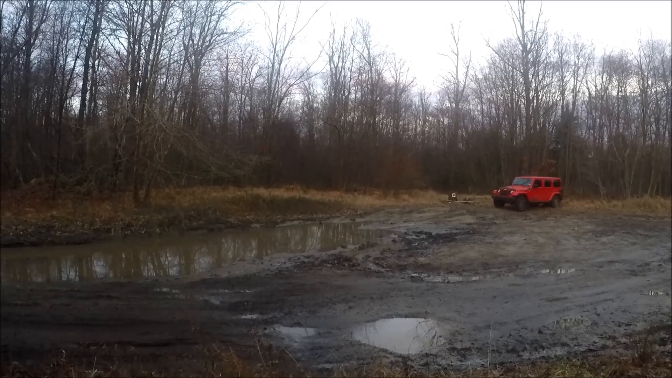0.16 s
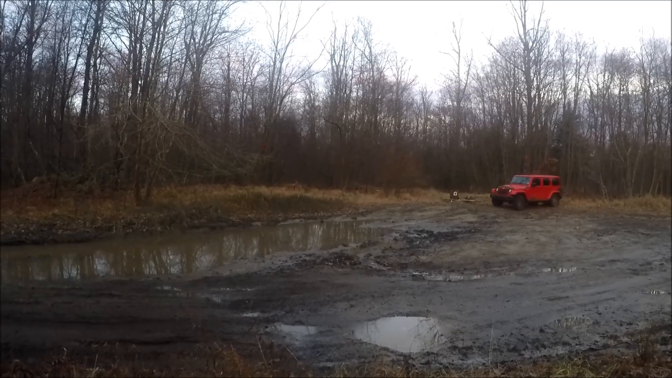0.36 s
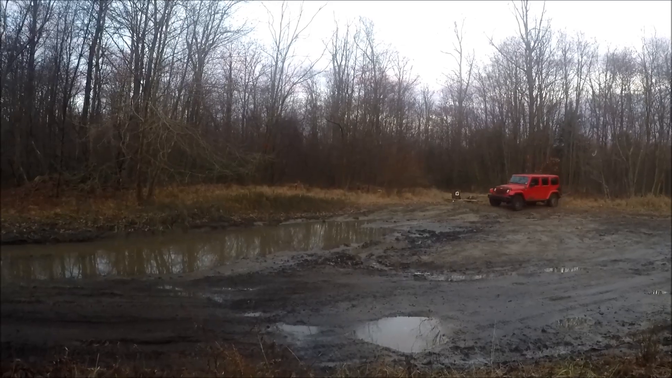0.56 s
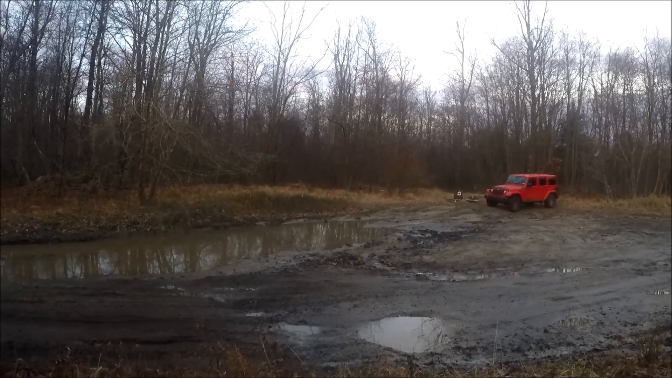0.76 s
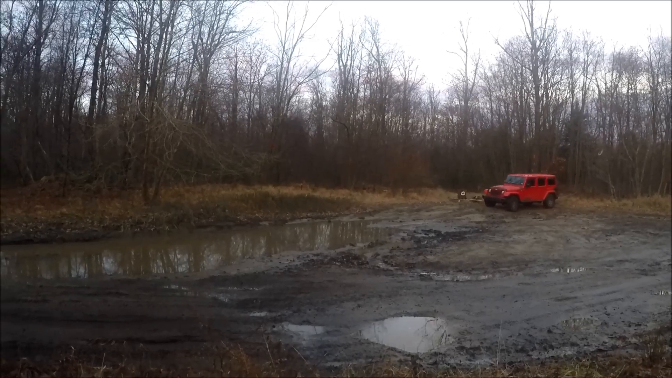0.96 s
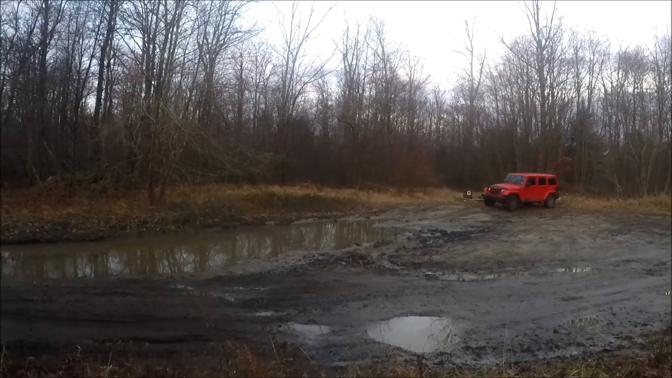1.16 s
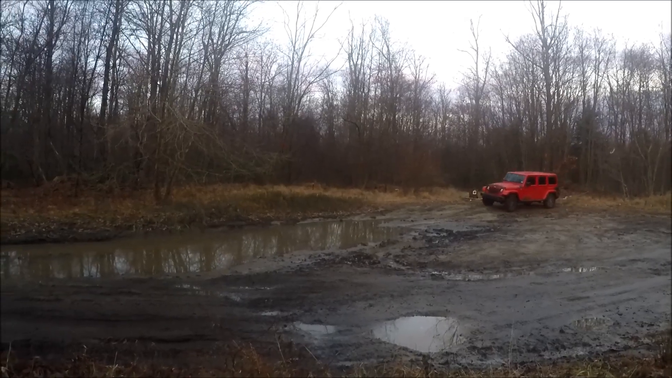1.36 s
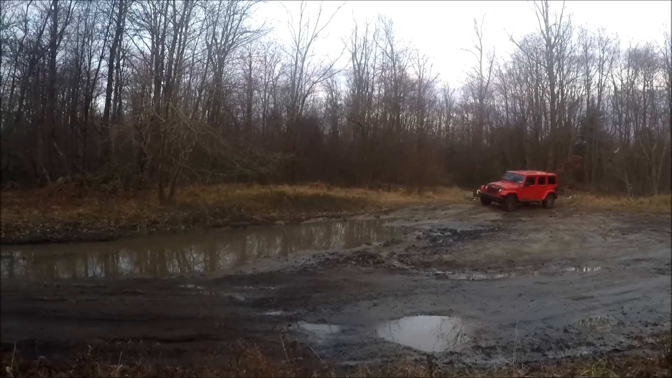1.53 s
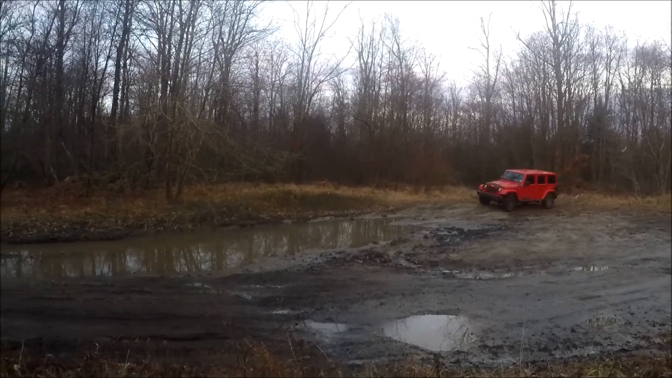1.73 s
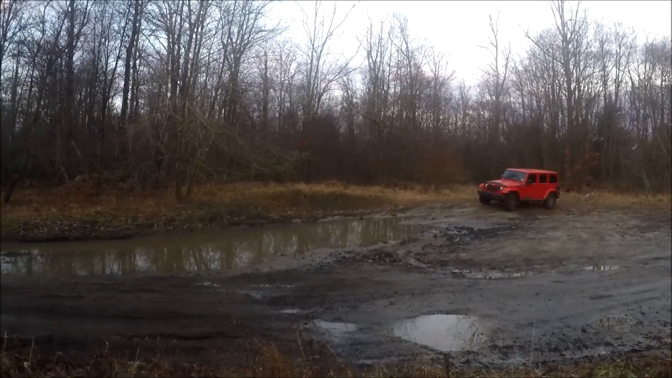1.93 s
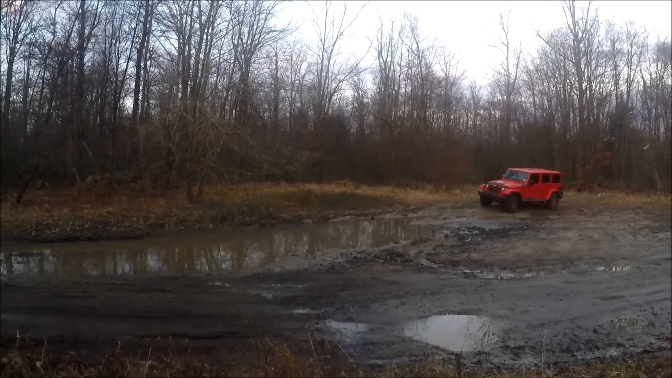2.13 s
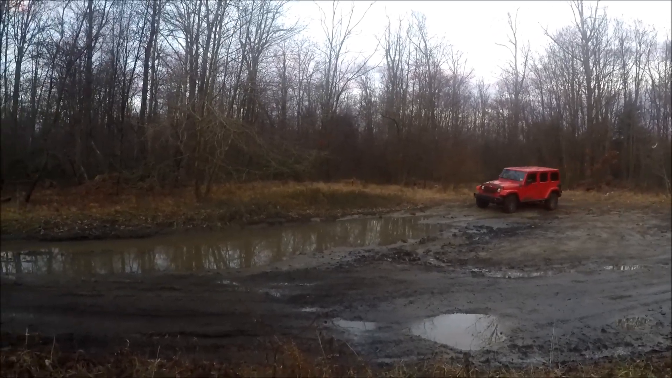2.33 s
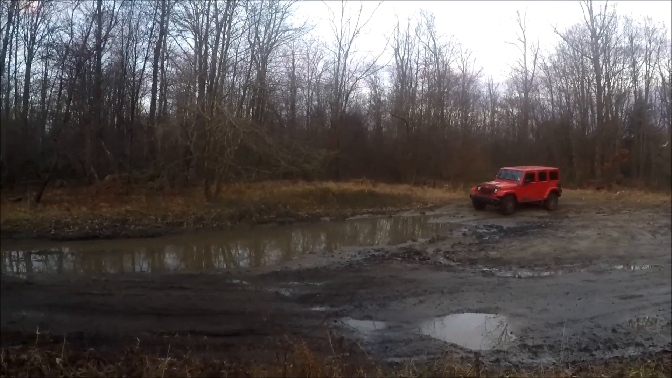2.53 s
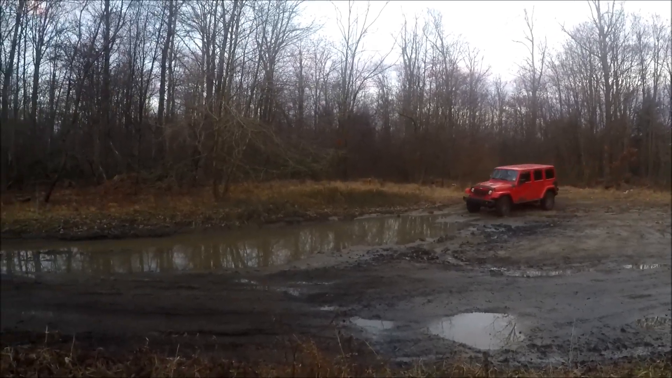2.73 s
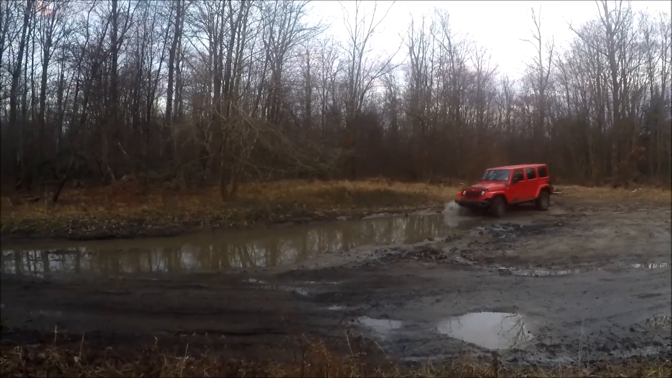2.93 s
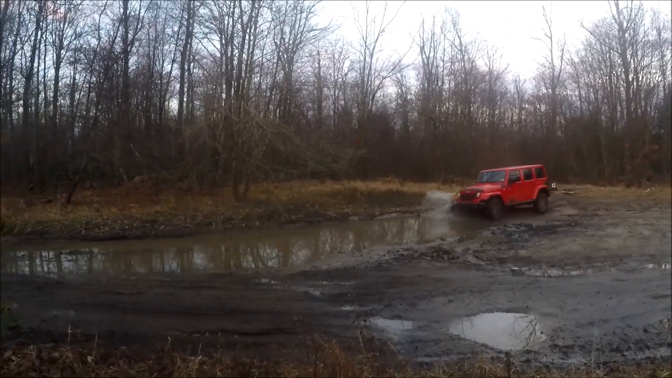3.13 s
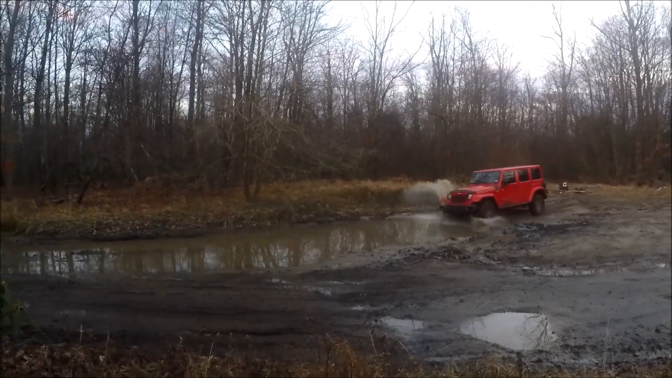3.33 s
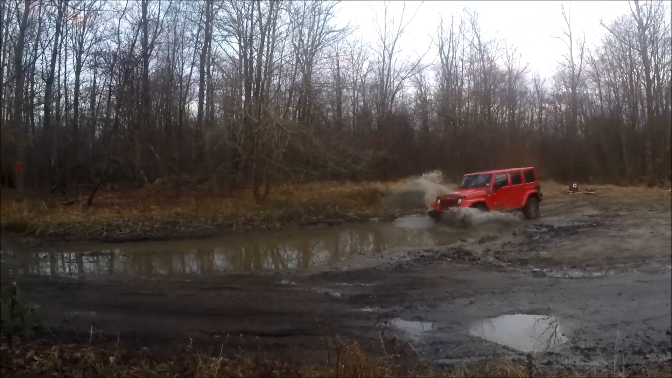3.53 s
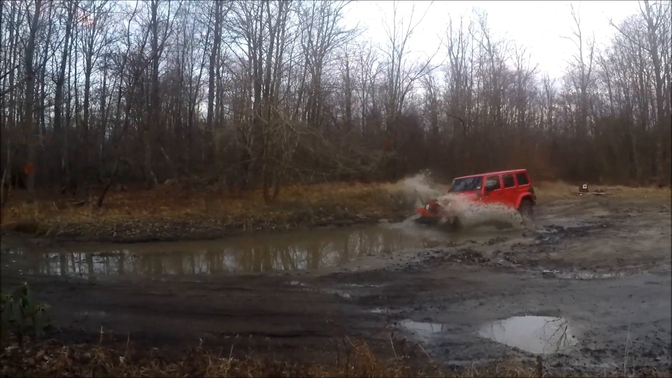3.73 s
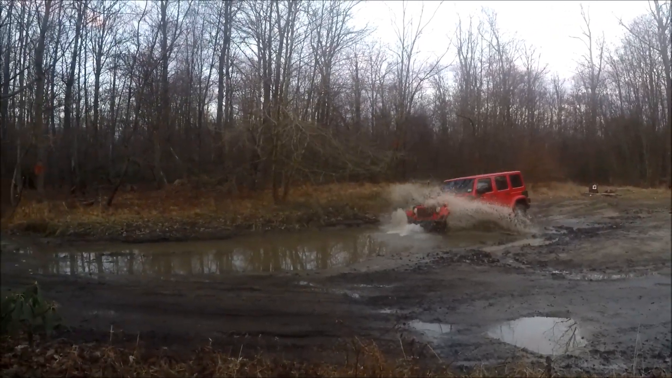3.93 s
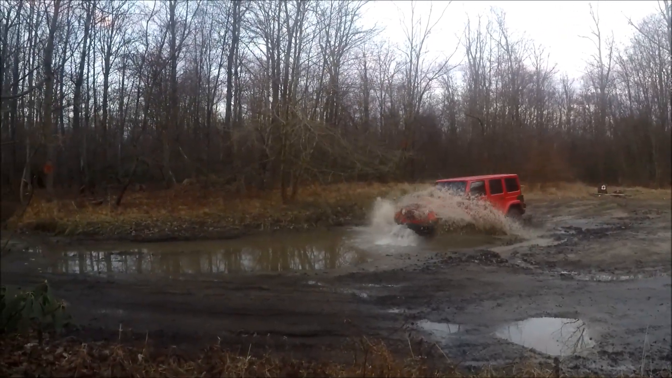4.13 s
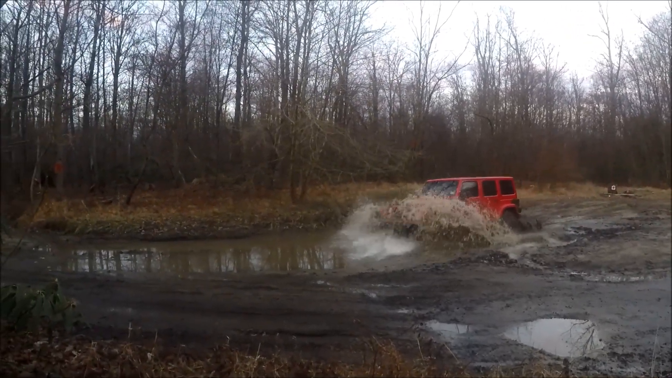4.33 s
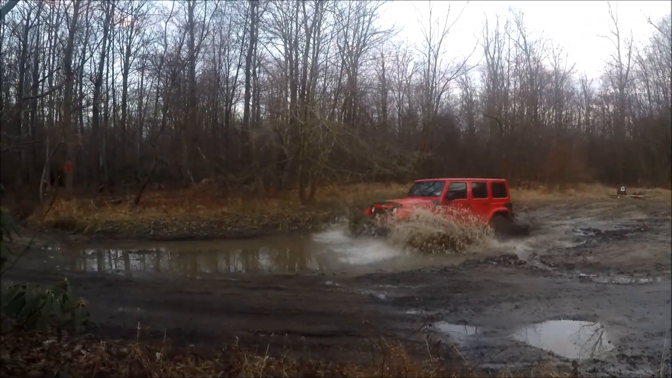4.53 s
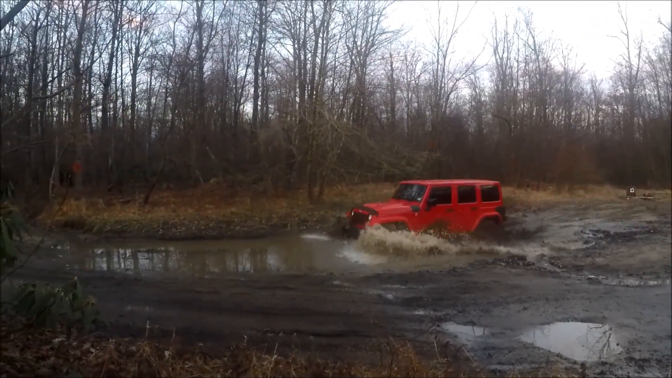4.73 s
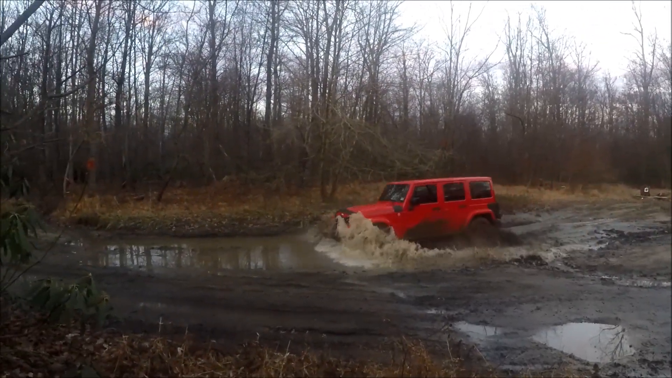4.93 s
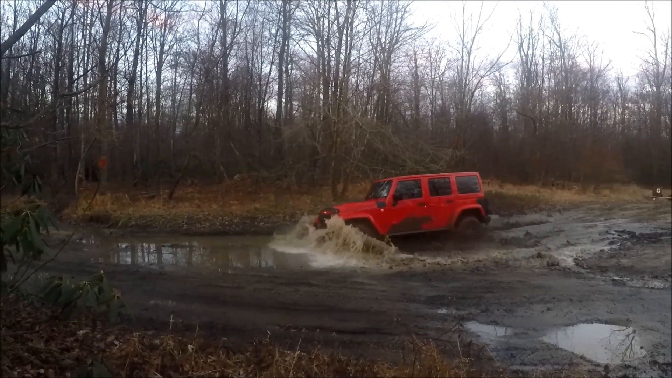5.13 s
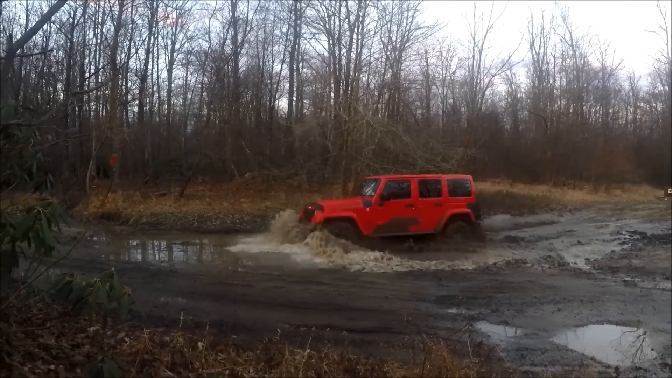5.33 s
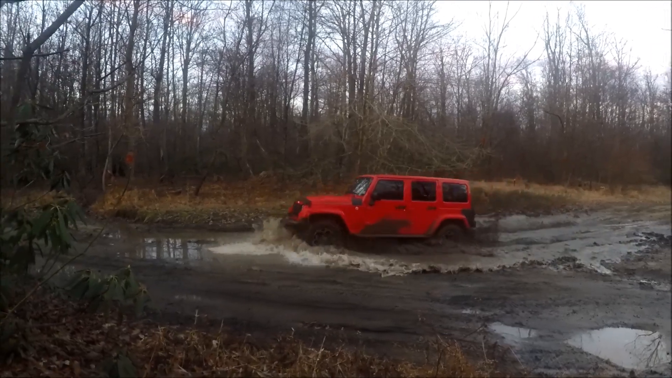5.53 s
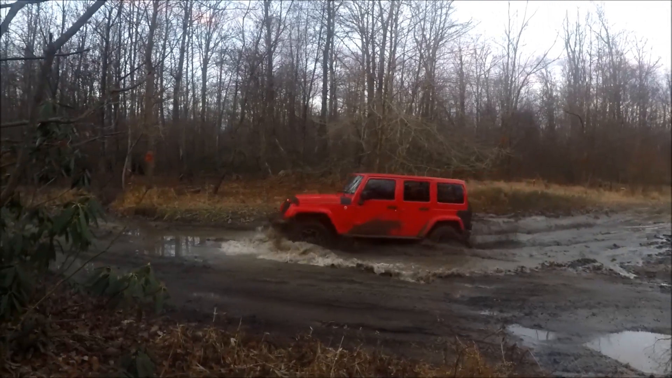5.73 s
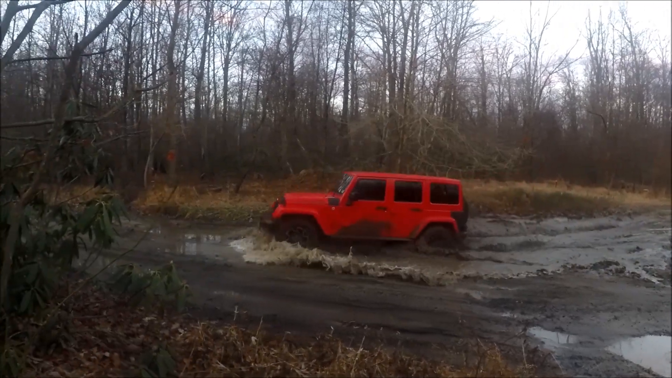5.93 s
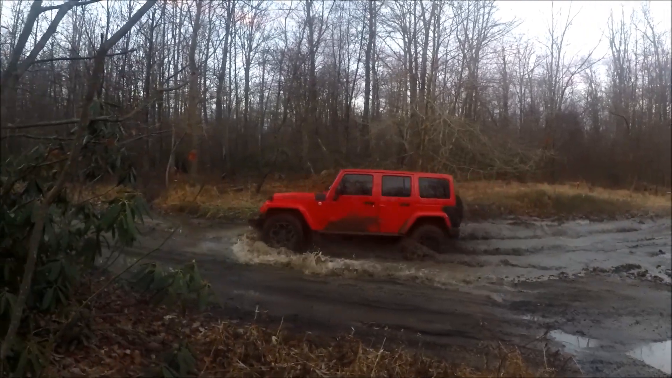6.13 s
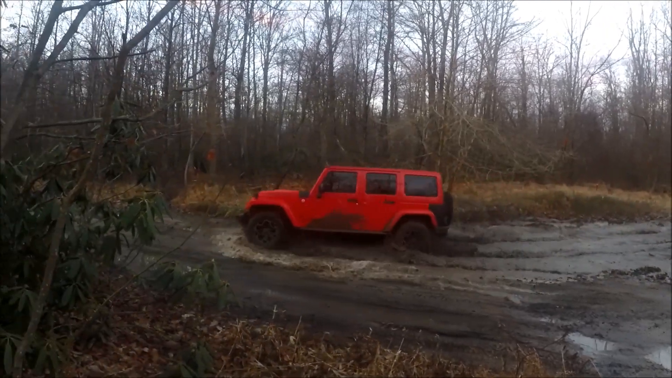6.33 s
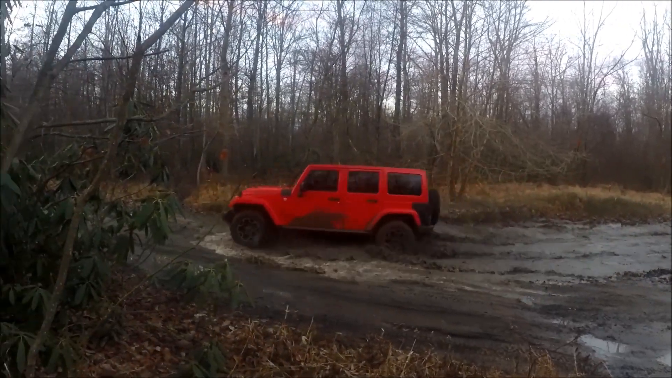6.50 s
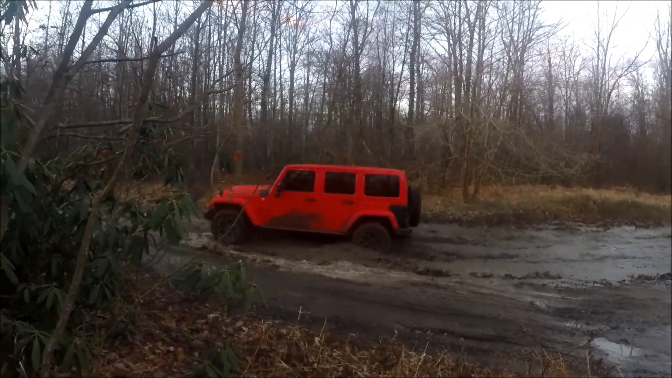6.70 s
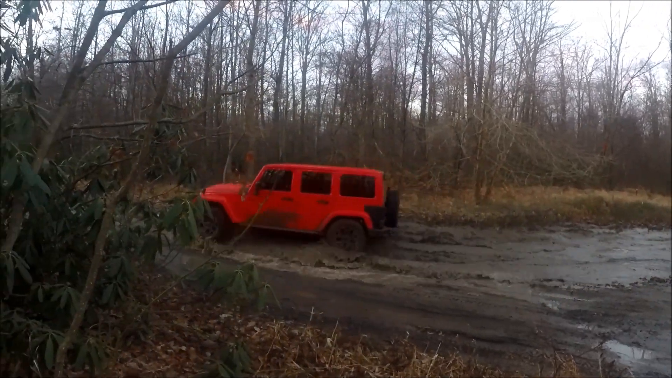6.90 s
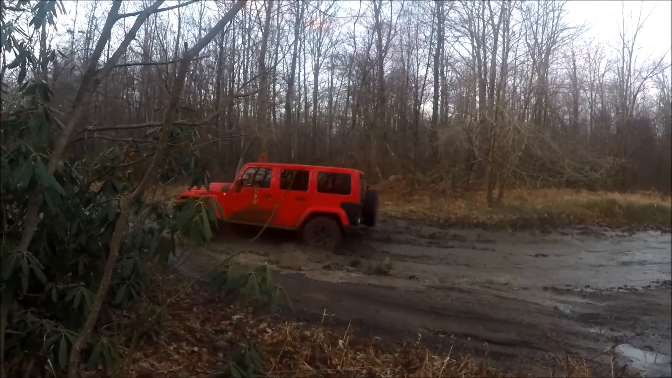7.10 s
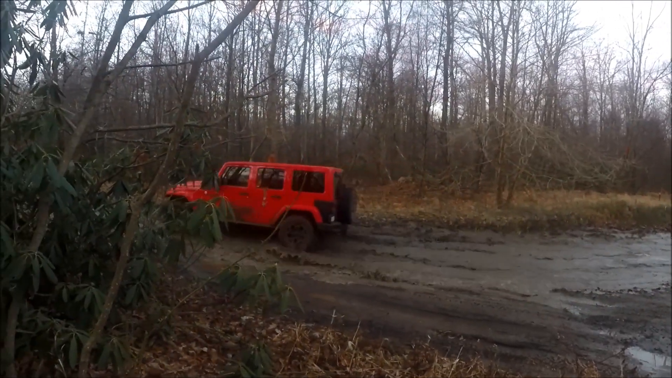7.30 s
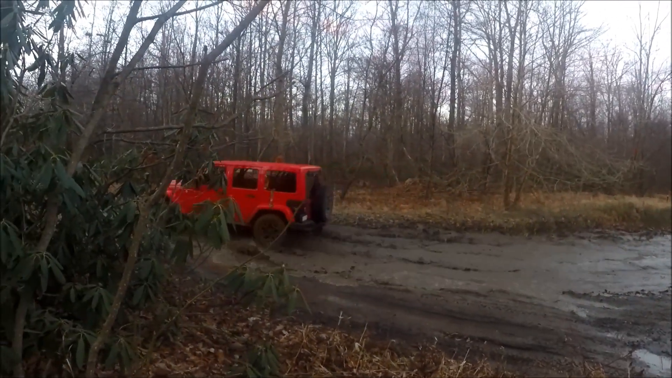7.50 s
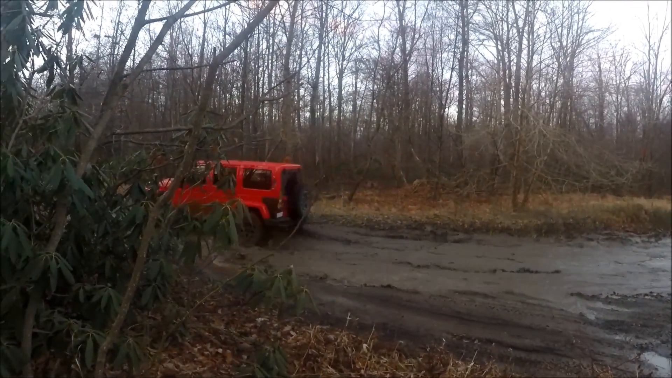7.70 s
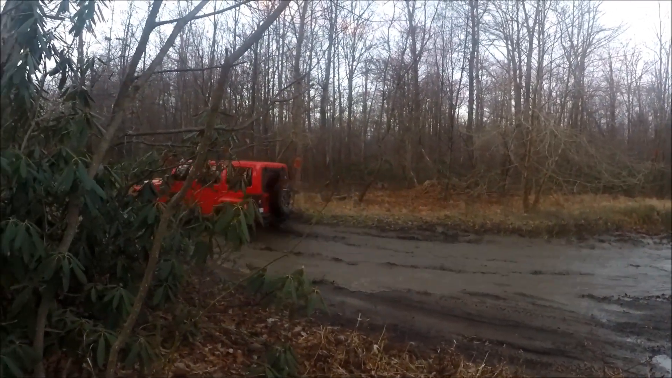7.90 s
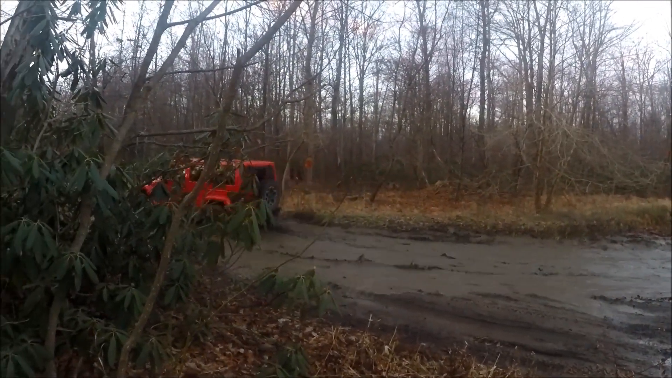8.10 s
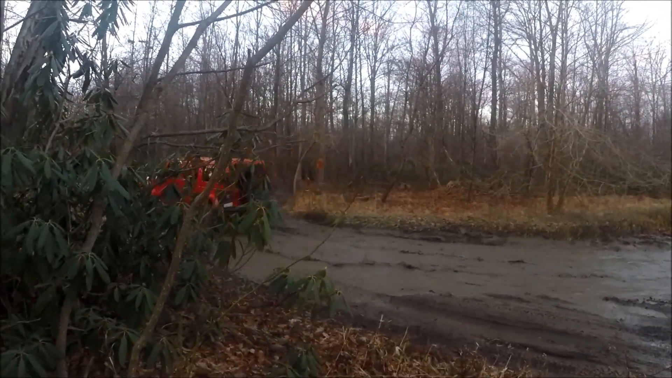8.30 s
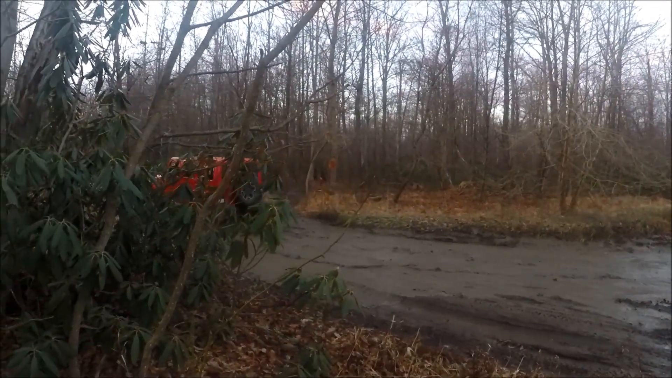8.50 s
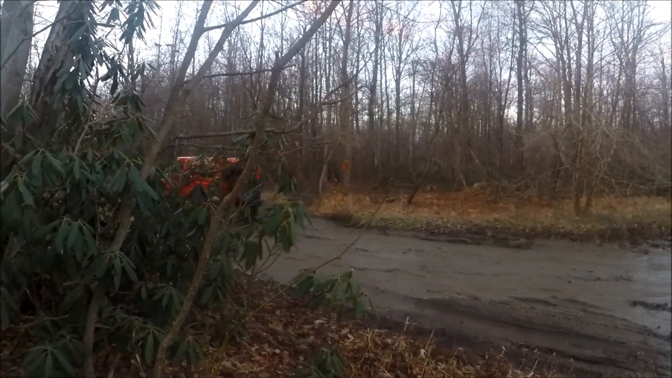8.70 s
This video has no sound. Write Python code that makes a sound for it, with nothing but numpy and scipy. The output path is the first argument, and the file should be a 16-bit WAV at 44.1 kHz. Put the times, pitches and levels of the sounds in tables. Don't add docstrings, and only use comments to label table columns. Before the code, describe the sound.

A quiet start of light wind, faint hiss and distant engine rumble. The engine pulls harder, a finger knocks the recorder, and water bursts into broad, bright, grainy spray. More knocks follow at once. The vehicle passes in rough, throaty exhaust and continuous splashing, with low wind buffeting the open microphones, then recedes; the engine falls more than the wet hiss, with a last puff and click.

```python
import sys
import numpy as np
from scipy import signal
from scipy.fft import rfft, irfft, next_fast_len
from scipy.io import wavfile
from scipy.ndimage import uniform_filter1d, minimum_filter1d, map_coordinates

SR = 44100
rng = np.random.default_rng(int(sys.argv[2]) if len(sys.argv) > 2 else 0)


def nominal_scale(level):
    x = np.asarray(level, float) / 20
    return 10 ** x


def transcribe(signal):
    frames = np.atleast_2d(signal).T
    limited = np.clip(frames, -1, 1)
    pcm = np.round(limited * 32767).astype(np.int16)
    wavfile.write(sys.argv[1], SR, pcm)


N = 385875

LOW_CUT_HZ = 157
# start_s, let_through_db
LOW_CUT_OPENING = [(0.0, -15), (.6, -19), (1.35, -28), (2.4, -35), (3.1, -39), (3.28, -18), (4.2, -27),
                   (4.5, -2), (5.1, 5.7), (8.75, 1)]


def rms_one(x):
    return x / np.sqrt(np.mean(x ** 2) + 1e-20)


def in_time(rows):
    s, *columns = np.transpose(rows)
    return [np.interp(np.arange(N) / SR, s, column) for column in columns]


def at_hz(points, hz):
    point_hz, value = np.array(points).T[:2]
    return np.interp(np.log(hz), np.log(point_hz), value)


def drift(rate):
    r = np.exp(-80 * np.pi * rate / SR)
    chance = rng.standard_normal(N // 40 + 2002)
    slow = signal.lfilter([1], [1, -2 * r, r * r], chance)[2000:]
    return np.interp(np.arange(N) / 40, np.arange(len(slow)), rms_one(slow))


def cut(x, hz, kind, order):
    return signal.sosfilt(signal.butter(order, hz, kind, fs=SR, output="sos"), x)


def ring(x, hz, t60):
    r = nominal_scale(-60 / (t60 * SR))
    w = 2 * np.pi * hz / SR
    return signal.lfilter([0, np.sin(w)], [1, -2 * r * np.cos(w), r * r], x + 1e-18)


def grains(per_s, spread_db, shape):
    sizes = nominal_scale(spread_db * np.minimum(rng.exponential(1, shape), 5))
    signs = rng.choice([-1, 1], shape)
    return rms_one(sizes * signs * (rng.random(shape) < per_s / SR))


def clicks(times, levels_db):
    out = np.zeros(N)
    out[(np.asarray(times) * SR).astype(int)] = nominal_scale(np.asarray(levels_db))
    return out


def hiss():
    # pitch_hz, level_db per Hz
    hiss_colour = [(150, -40), (450, -1), (1500, 5), (4000, -7), (6500, -7), (8000, -1), (10500, -7),
                   (12000, -12), (14500, -17)]
    # pitch_hz, level_db
    whine = [(8210, -92)]
    size = next_fast_len(N)
    hz = np.arange(size // 2 + 1) * SR / size + 1e-3
    spectrum = rfft(rng.standard_normal((2, size))) * nominal_scale(at_hz(hiss_colour, hz))
    noise = irfft(spectrum, size)[:, :N]
    whine_hz, whine_db = whine[0]
    thin_tone = nominal_scale(whine_db - 12) * np.sin(2 * np.pi * whine_hz * np.arange(N) / SR)
    return nominal_scale(-52.5) * rms_one(noise) + thin_tone


def gusts_db():
    # start_s (middle of the bell), level_db above the breeze, length_s
    gusts = [(.3, 3, 0.18), (.58, -1, .08), (2.026, 4, .05), (4.04, 7, .15), (5.105, 3, 0.11),
             (5.627, 8, 0.19), (6.22, 9, 0.084), (6.397, 6.5, .15), (6.663, 3, 0.037), (6.815, 7, 0.067),
             (7.02, 2.5, 0.071), (7.27, 7.5, 0.35), (7.55, 1, 0.067), (8.72, 7, .06)]
    t = np.arange(0, N, 64) / SR
    bells = sum(db * np.exp(-((t - s) / length) ** 2 * 2) for s, db, length in gusts)
    return np.interp(np.arange(N) / SR, t, bells)


def wind():
    # start_s, level_db, width_s
    puffs = [
        (8.228, -12, 0.0044),
        (8.529, -9.5, 0.0053),
    ]
    breeze_db, swing_db = -34, 1.6
    pressure = cut(rng.standard_normal((3, N)), 49, "low", order=3)
    common, left, right = cut(pressure, 3.3, "high", order=2)
    level_db = breeze_db + in_time(LOW_CUT_OPENING)[0] + gusts_db()
    lumps = nominal_scale(level_db + swing_db * drift(4.6) + 2.05 * drift(30))
    out = lumps * rms_one(common + 0.41 * np.array([left, right]))
    for s, db, width in puffs:
        near = np.arange(int((s - .1) * SR), int((s + .15) * SR))
        for port, late_s in enumerate((.0018, 0)):
            u = (near / SR - s - late_s) / width
            suck = np.exp(np.minimum(u, 0) * 0.98) * (u < 0)
            push = np.exp(-np.maximum(u, 0) * 0.89) * (u >= 0)
            out[port, near] += nominal_scale(db) * cut(push - suck, 200, "low", order=2)
    return out


def tone(rows, orders):
    fade_in = (rows[0][0] - .08, rows[0][1], -80)
    fade_out = (rows[-1][0] + 0.072, rows[-1][1], -80)
    hz, db = in_time([fade_in] + rows + [fade_out])
    phase = 2 * np.pi * np.cumsum(hz) / SR
    return nominal_scale(db + 7.5) * sum(nominal_scale(d) * np.sin(round(k) * phase + k * k) for k, d in orders)


def engine():
    # start_s, rumble_db
    load = [(0.0, -42.5), (1.0, -44), (1.8, -42), (2.45, -36.5), (2.7, -40), (3.1, -35.5), (3.5, -33.5),
            (3.74, -27.5), (4.05, -28.5), (4.28, -23.5), (4.6, -25.5), (4.8, -24.5), (5.2, -24.5),
            (5.85, -21.5), (6.1, -26.5), (6.45, -25), (7.3, -30.5), (8.75, -40.5)]
    # pitch_hz, width_hz, level_db
    resonances = [(166, 81, -4), (221, 42.5, -0.5), (256.7, 56, -1.5), (386, 204, -5)]
    # start_s, base_hz, level_db of order 4
    pull = [(2.62, 50.5, -54), (2.644, 51.05, -46), (2.86, 54.4, -48), (2.944, 57.6, -53), (3.1, 59, -39)]
    # order, level_db
    pull_orders = [(3, -16), (4, 1.5), (5, -1), (6, -10)]
    # start_s, pitch_hz, level_db
    drone = [(5.85, 121, -35), (5.886, 117, -30), (5.95, 114, -32.5), (6.22, 103, -35), (6.382, 105, -32.5),
             (6.46, 110.5, -34.5), (6.55, 103.6, -43)]
    rumble_db = in_time(load)[0] + 0.72 * drift(12.5)
    deep_db = rumble_db - 7.5 + 0.59 * in_time(LOW_CUT_OPENING)[0] + 0.13 * gusts_db()
    beats = grains(260, 1.0, (3, N)) * nominal_scale(0.65 * drift(3.1))
    beats = beats + 0.65 * rng.standard_normal((3, N))
    pipe = np.zeros((3, N))
    for k, (hz, width_hz, db) in enumerate(resonances):
        pipe += (-1) ** k * nominal_scale(db) * rms_one(ring(beats, hz, 1.71 / width_hz))
    above_cut = cut(pipe, 0.908 * LOW_CUT_HZ, "high", order=12)
    rumble = rms_one(cut(above_cut, 860, "low", order=2))
    deep = rms_one(cut(cut(beats, LOW_CUT_HZ, "low", order=8), 49, "high", order=2))
    out = nominal_scale(rumble_db + 2.5) * rumble * nominal_scale([[0], [-14], [-14]])
    out += nominal_scale(deep_db + 1.5) * deep * nominal_scale([[0], [-15], [-15]])
    out[0] += tone(drone, [(0.94, 0)]) + tone(pull, pull_orders)
    return out


def water():
    # start_s, spray_db, drop_fineness_db
    thrown = [(0.0, -51, -0.5), (1.1, -48.5, -2), (2.08, -42.5, -4), (2.45, -42.5, -4.5),
              (2.82, -33.5, 1.5), (2.86, -24.5, 7), (2.93, -21, 7), (3.12, -25.5, 1), (3.32, -21.5, 9),
              (3.45, -20.5, 6.5), (3.55, -24, 2), (4.3, -26, 1), (4.66, -21, 7), (5.5, -22.5, 3.5),
              (6.31, -22, 4.5), (7.65, -23.5, 1.2), (8.24, -25.5, 1.5), (8.75, -27.5, 1.5)]
    # start_s, distance_m
    distance = [(0.0, 16.8), (2.6, 23.2), (3.3, 22.8), (4.3, 13.4), (4.9, 13.3), (6.3, 20), (7.4, 24.4),
                (8.75, 35)]
    # pitch_hz, level_db per Hz
    spray_colour = [(400, -4.5), (800, 11), (1600, 4.5), (2400, 0), (3300, -0.5), (4500, -2), (5900, 3),
                    (7000, -6), (8200, -15), (9500, -36.5), (11500, -29), (14500, -39)]
    # pitch_hz, level_db
    before_plunge = [(2400, 0.6), (3500, 3), (4500, -4.5), (5700, 2), (7000, 1.8)]
    # pitch_hz, level_db
    off_trees = [(400, -9), (800, -14.5), (1600, -9.5), (3000, -10.5), (4500, -7), (6000, -6), (7300, -1.5),
                 (8250, 18), (9200, 19), (12000, 12)]
    spray_db, fine_db = in_time(thrown)
    mist_db = 5 - 0.67 * in_time(distance)[0]
    since = np.arange(N) / SR - 2.75
    wet = since > 0
    cloud_db = -13 * np.exp(-np.maximum(since, 0) / 0.71) * wet
    drops = grains(9000, 2.4, (2, 3, N)) + 0.85 * rng.standard_normal((2, 3, N))
    edges = 400 * 2 ** np.arange(0, 5.4, 1 / 3)
    surge = drift(36)
    sheets = [drift(14) for _ in range(4)]
    out = np.zeros((3, N))
    for k, (low, high) in enumerate(zip(edges, edges[1:])):
        hz = np.sqrt(low * high)
        heavy = at_hz([(1500, 0.78), (3200, 0.065)], hz)
        fine = at_hz([(3800, 0.18), (6500, 0.64), (9000, 1.17), (14000, 1.2)], hz)
        colour_db = at_hz(spray_colour, hz) + heavy * (3.5 - fine_db) + fine * mist_db
        colour_db = colour_db + at_hz([(9000, 0), (12500, 0.91)], hz) * cloud_db
        colour_db = colour_db + at_hz(before_plunge, hz) * (since < 0)
        flicker_db = 0.097 * surge + (0.54 + 0.19 * fine) * sheets[k // 4]
        flicker_db = flicker_db + .5 * drift(37) + 0.53 * drift(1.45)
        scattered = nominal_scale(at_hz(off_trees, hz))
        band = cut(drops[k % 2], [low, high], "band", order=2)
        out += band * nominal_scale(colour_db + flicker_db) * [[1], [scattered], [scattered]]
    return nominal_scale(spray_db + 8.5) * cut(out, 2 * LOW_CUT_HZ, "high", order=4)


def spurts():
    # start_s, level_db, pitch_hz, length_s
    jets = [
        (1.93, -30.5, 1700, .006),
        (3.258, -17.5, 6000, 0.022),
        (5.09, -22, 4000, 0.0066),
    ]
    out = np.zeros((3, N))
    for s, db, hz, length in jets:
        near = np.arange(int((s - .05) * SR), int((s + .05) * SR))
        noise = rng.standard_normal(len(near))
        jet = rms_one(cut(noise, [hz * 0.93, hz * 1.12], "band", order=2))
        out[0, near] += nominal_scale(db) * jet * np.exp(-((near / SR - s) / length) ** 2)
    return out


def handling():
    # start_s, level_db, thud_db above the crack
    taps = [
        (2.034, -25, -1.5),
        (2.532, -2.5, 3.5),
        (2.583, -24.5, 10),
        (3.143, -3.5, 5.5),
        (3.2027, -4.5, 9),
    ]
    # start_s, level_db, direction
    ticks = [
        (2.4811, -11, 1),
        (3.1895, -10, -1),
        (8.5236, -9, -1),
    ]
    # later_s, level_db
    rebounds = [(0.00142, -4.5), (0.00047, -5)]
    # pitch_hz, level_db, t60_s
    crack_modes = [
        [(840, -11, 0.0081), (1560, -31, 0.031), (1970, 5.5, 0.0036), (2930, -5, 0.0049)],
        [(740, 6.5, 0.0038), (1550, -21, 0.05), (2360, -3, 0.0043), (4840, -9, .002)],
    ]
    # pitch_hz, level_db, t60_s
    thud_modes = [
        [(258, -7, 0.066), (500, -16.5, 0.03)],
        [(162, 2, 0.072), (354, 3.2, 0.007)],
    ]
    thud_late = [.0003, .0009]
    s, db, thud_db = np.transpose(taps)
    flex = sum(way * clicks([at], [level_db]) for at, level_db, way in ticks)
    flex_left = 1.2 * ring(flex, 1300, .007) + .45 * ring(flex, 2600, .006)
    flex_right = -1.9 * ring(flex, 750, .003)
    out = np.array([flex_left, flex_right])
    for port, (later, rebound_db) in enumerate(rebounds):
        crack = clicks(s + later, db + rebound_db) - clicks(s, db)
        thud = clicks(s + thud_late[port], db + thud_db)
        out[port] += sum(nominal_scale(d) * ring(crack, hz, t60) for hz, d, t60 in crack_modes[port])
        out[port] += sum(nominal_scale(d) * ring(thud, hz, t60) for hz, d, t60 in thud_modes[port])
    soft = cut(out, 6600, "low", order=3)
    low_cut = signal.butter(5, LOW_CUT_HZ, "high", fs=SR, output="sos")
    return signal.sosfiltfilt(low_cut, soft)


def ports(sound):
    # pitch_hz, width_hz, depth_db
    left_dips = [(465, 61, -13.5), (1176, 482, -22.5), (2670, 580, -7.5), (3360, 120, -9),
                 (4100, 190, -3.5), (5810, 950, -10), (8250, 150, 3)]
    # pitch_hz, width_hz, depth_db
    right_dips = [(527, 254, -21.5), (1135, 176, -19.5), (2070, 266, -18.5), (2680, 270, -7.5),
                  (5050, 290, -1.5), (7300, 750, -19), (7900, 430, -35)]
    # pitch_hz, lead_rad
    right_lead = [(80, 0), (340, -.25), (440, -.7), (620, 1.2), (860, 1.8), (1050, 3.1), (1300, 5.3),
                  (2000, 5.3), (2200, 6.7), (2800, 6.4), (4200, 6.4), (5300, 7.1), (6500, 5.8), (8200, 3.5)]
    size = next_fast_len(N + 4096)
    hz = np.arange(size // 2 + 1) * SR / size + 1e-3

    def port_response(dips):
        return nominal_scale(sum(db / (1 + ((hz - f) / width) ** 2 * 4) for f, width, db in dips))

    direct = rfft(sound[0], size)
    left = irfft(direct * port_response(left_dips), size)[:N]
    lead = np.exp(1j * at_hz(right_lead, hz))
    right = irfft(direct * port_response(right_dips) * lead, size)[:N]
    return np.array([left, right]) + sound[1:]


def passing(pair):
    # start_s, right_early_s, left_over_right_db
    crossing = [(0, 30e-6, -1), (1.5, 30e-6, -3.5), (3.5, 25e-6, -3.5), (5.3, 0, -2.5), (7, -15e-6, -2),
                (8.75, -30e-6, 0)]
    early, pan_db = in_time(crossing)
    right = map_coordinates(pair[1], [np.arange(N) + SR * early], order=3, mode="nearest")
    return np.array([pair[0], right]) * nominal_scale(np.array([pan_db, -pan_db]) / 2)


def scene():
    vehicle = engine() + water() + spurts()
    return passing(ports(vehicle)) + wind() + handling() + hiss()


def limiter(pair):
    limit_db, most_db = -3, 5.5
    hold_s, release_db_s, attack_s = .03, 300, .007
    peak_db = 20 * np.log10(np.abs(pair).max(axis=0) + 1e-9)
    over_db = np.clip(peak_db - limit_db, 0, most_db)
    hold = int(hold_s * SR)
    over_db = np.roll(-minimum_filter1d(-over_db, size=hold), hold // 2)
    ramp = release_db_s * np.arange(N) / SR
    held_db = np.maximum.accumulate(over_db + ramp) - ramp
    r = np.exp(-1 / (attack_s * SR))
    gain = nominal_scale(-signal.lfilter([1 - r], [1, -r], held_db))
    return 1.068 * np.tanh(pair * gain / 1.135)


def starved(x):
    # pitch_hz, level_db
    masked = [(7400, -20), (7900, -6.5), (8800, -7), (9800, -5.5), (11300, -6), (12600, -3.5),
              (13800, -5.5), (14600, -3)]
    # pitch_hz, level_db
    too_faint = [(10500, -36), (12500, -30), (14000, -37), (14600, -34)]
    hz, _, z = signal.stft(x, SR, "hann", 2048, 1280)
    cells = uniform_filter1d(np.sum(np.abs(z) ** 2, axis=0), size=5, axis=0)
    around = uniform_filter1d(uniform_filter1d(cells, size=61, axis=0), size=3, axis=1)
    least = around * nominal_scale(2 * at_hz(masked, hz + 1) + 10.5)[:, None]
    weak = (cells < least) & (hz > 7400)[:, None]
    spray = uniform_filter1d(cells[(hz > 3000) & (hz < 6500)].mean(axis=0), size=5)
    groups = uniform_filter1d(uniform_filter1d(cells, size=17, axis=0), size=2, axis=1)
    faintest = spray * nominal_scale(2 * at_hz(too_faint, hz + 1))[:, None]
    weak |= (groups < faintest) & (hz > 10500)[:, None]
    return signal.istft(z * (1 - .995 * weak), SR, "hann", 2048, 1280)[1][:, :N]


def roll_off(x):
    return signal.sosfilt(signal.butter(12, 15020, fs=SR, output="sos"), x)


def record(dry):
    mix = starved(limiter(dry))
    return roll_off(mix)


dry = scene()
out = record(dry)
transcribe(out)
```